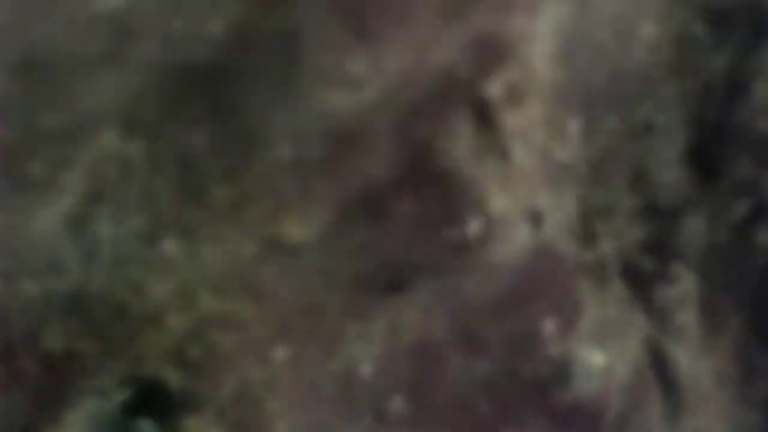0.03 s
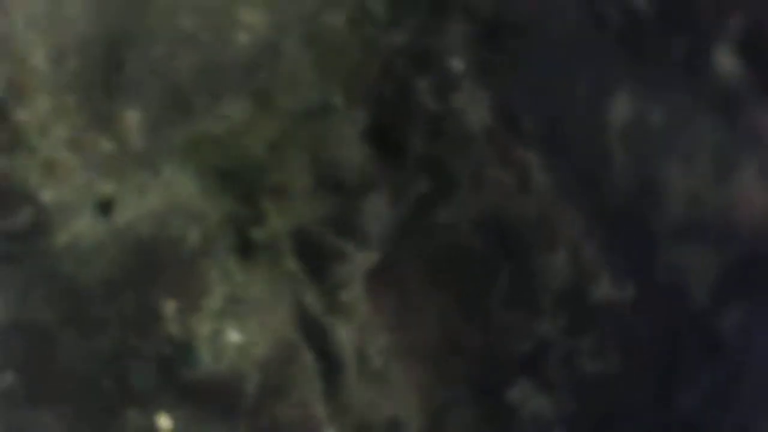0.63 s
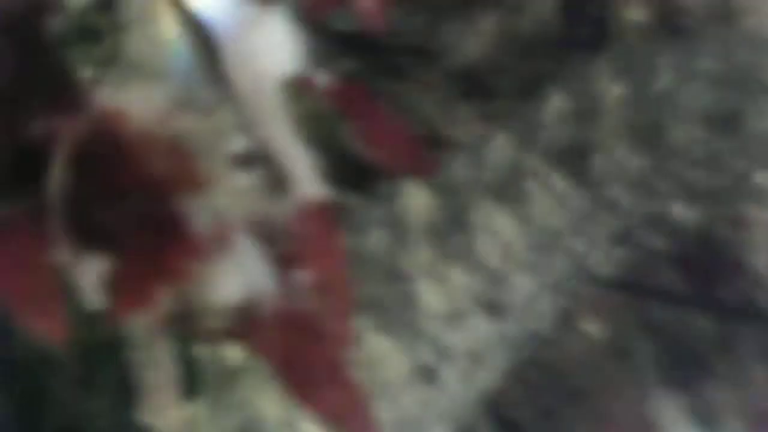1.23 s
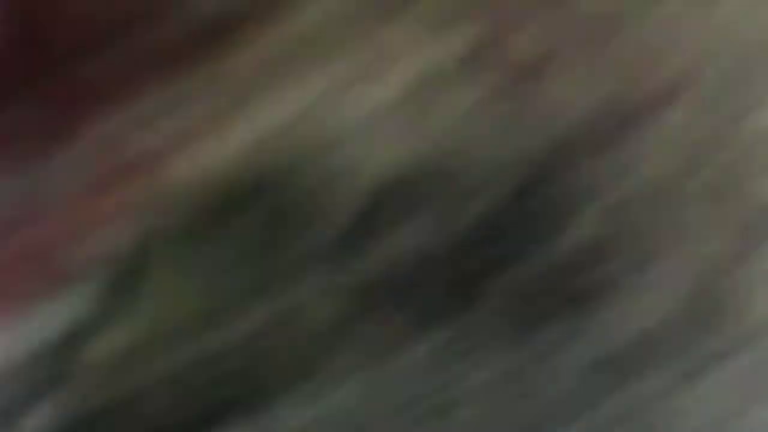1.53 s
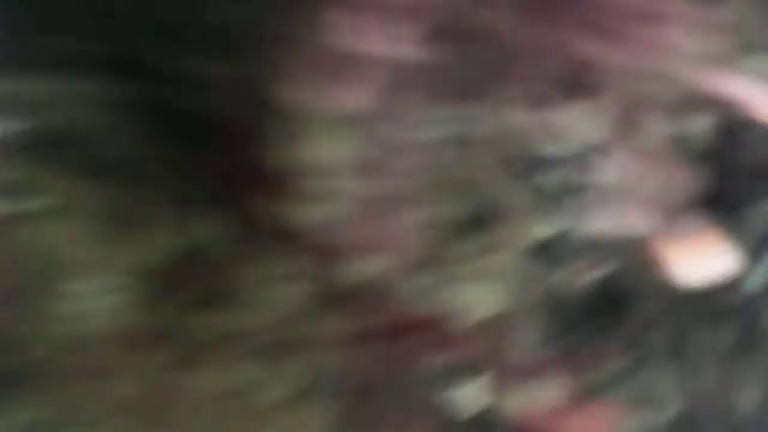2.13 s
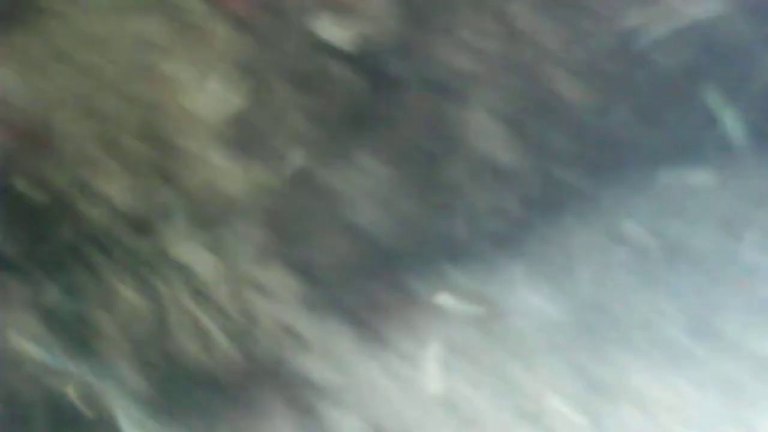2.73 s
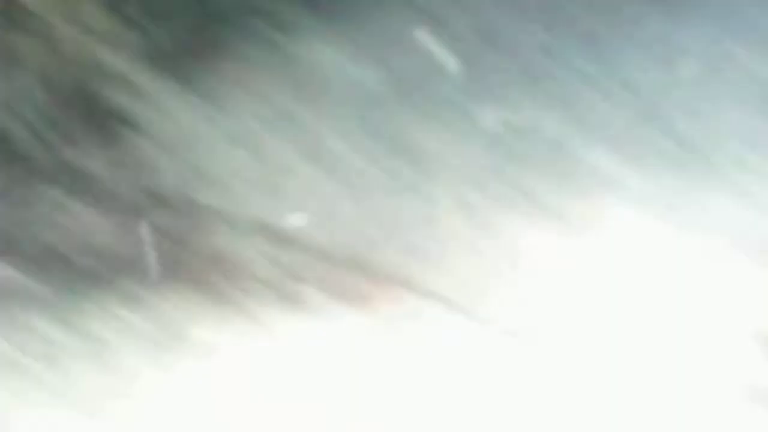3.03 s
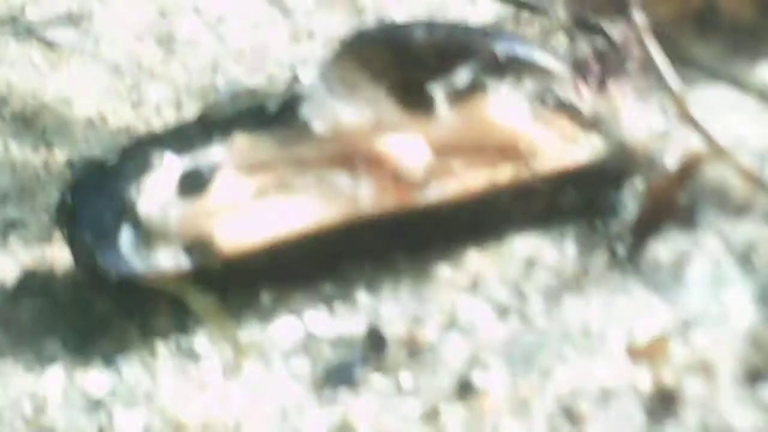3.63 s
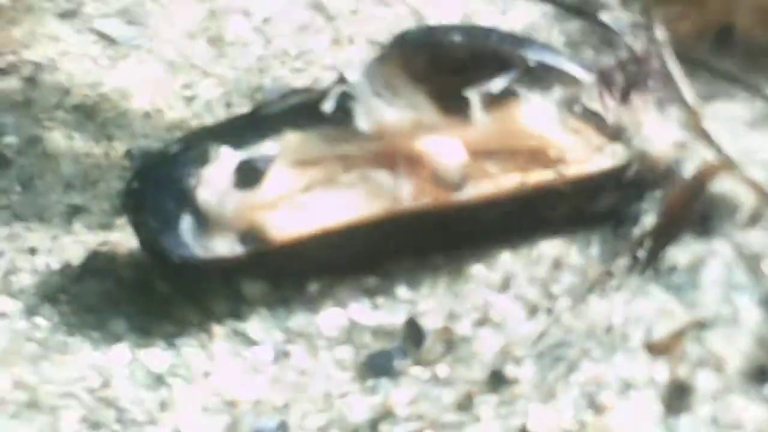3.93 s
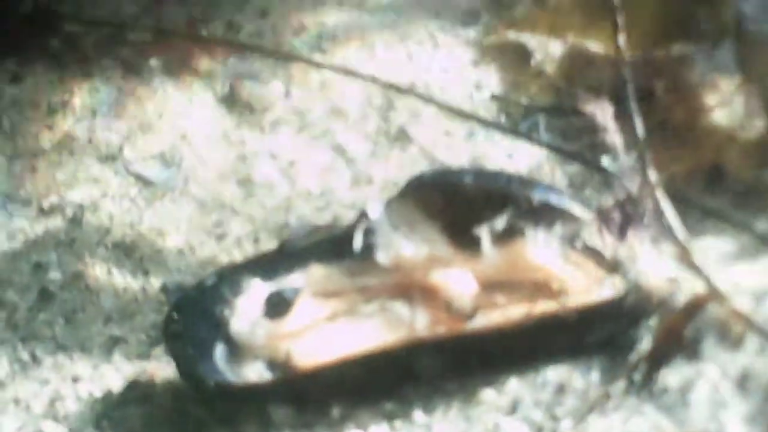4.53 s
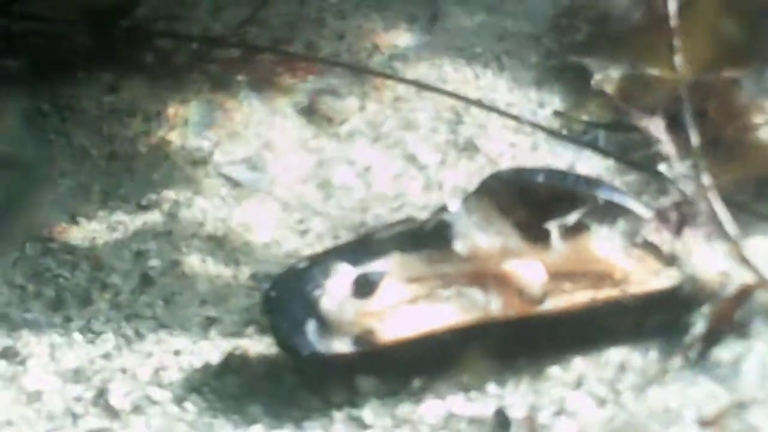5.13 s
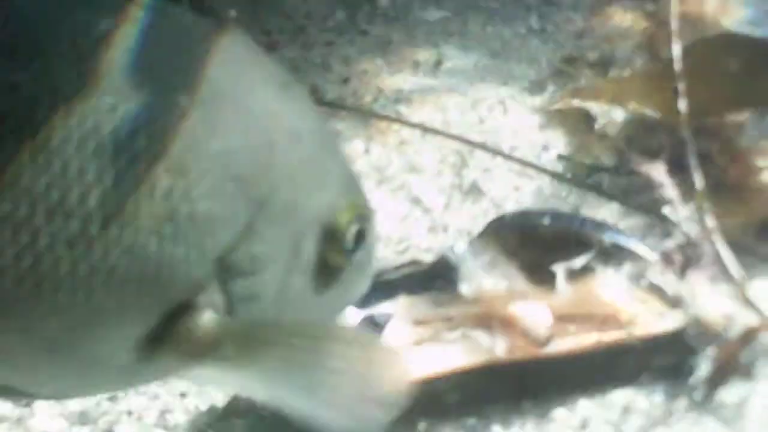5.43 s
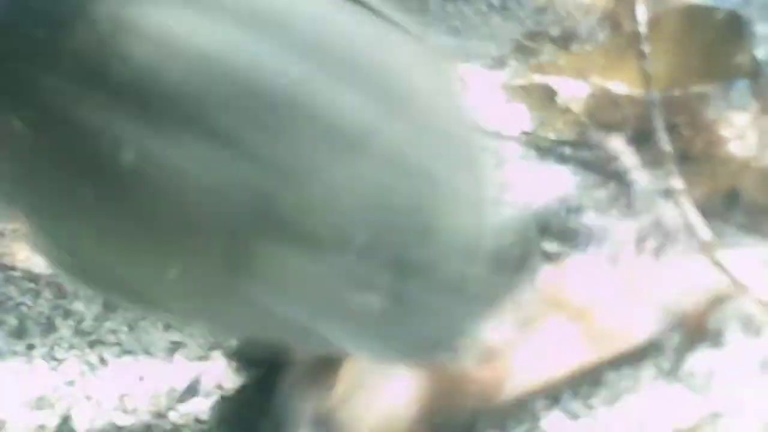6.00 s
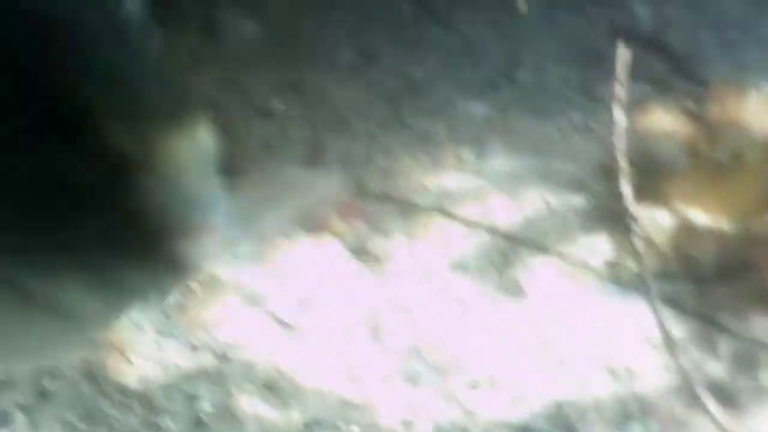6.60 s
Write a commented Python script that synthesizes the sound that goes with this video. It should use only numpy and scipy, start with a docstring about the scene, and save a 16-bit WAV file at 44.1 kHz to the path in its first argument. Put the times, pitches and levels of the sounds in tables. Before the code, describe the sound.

Close, boxy scrapes and booming knocks come as a waterproof camera bumps over rock in a tide pool, with dull churning water and small gravel taps around the enclosed microphone. After the loudest, distorted blow there is a lull with a faint whine and one clear bubble plop. Sloshing and fizzing resume with a few soft knocks, then two low swirls from a passing fish die away into whine and hiss.

```python
"""A camera in a waterproof housing is swept through a shallow tide pool, scraping on rock from the start.
Muffled water rumbles, washes and fizzes around it, and loose gravel taps the shell. Blows excite the
hollow housing's resonances, and the hardest booms overload the microphone. Then the water calms, the
camera's thin whine shows and a bubble plops. The flow returns with lighter knocks, a fish stirs two
deep swirls, and the water dies away to leave the whine."""
import sys
import numpy as np
from scipy import signal
from scipy.fft import rfft, irfft, next_fast_len
from scipy.io import wavfile
from scipy.ndimage import map_coordinates

SR = 44100
rng = np.random.default_rng(int(sys.argv[2]) if len(sys.argv) > 2 else 0)


def output_pcm(signal):
    """Save a mono or channel-first signal as 16-bit PCM at the path in sys.argv[1].

    Samples are clipped to [-1, 1] before scaling.
    """
    pcm = np.clip(np.atleast_2d(signal).T, -1, 1) * 32767
    wavfile.write(sys.argv[1], SR, np.round(pcm).astype(np.int16))


N = 298116

# modes of the hollow housing: (ratio to the boom pitch, level [dB], t60 [s])
HOUSING_MODES = [(1, 1.5, 0.035), (.88, -13, 0.083), (1.36, -18, 0.039), (2.02, -24, 0.066),
                 (2.9, -52, 0.018)]


def amp(db):
    """Decibels to amplitude ratio."""
    return 10 ** (np.asarray(db) / 20)


def unit(x):
    """Normalisation to rms 1."""
    return x / np.sqrt(np.mean(x ** 2) + 1e-20)


def curve(rows):
    """Linear interpolation of (time [s], value) at each sample."""
    return np.interp(np.arange(N) / SR, *np.transpose(rows))


def wobble(rate):
    """Smooth random modulation: a spline with rate knots a second."""
    knots = rng.standard_normal(int(N * rate / SR) + 4)
    return map_coordinates(knots, [np.arange(N) * rate / SR])


def coloured(x, points, size=8192):
    """Minimum-phase filtering by (frequency [Hz], gain [dB]) points."""
    hz, db = np.transpose(points)
    gain = amp(np.interp(np.log(np.fft.rfftfreq(size, 1 / SR) + 1), np.log(hz), db))
    cepstrum = irfft(np.log(gain))
    cepstrum[1:size // 2] *= 2  # folding the cepstrum makes the filter causal
    cepstrum[size // 2 + 1:] = 0
    return signal.fftconvolve(x, irfft(np.exp(rfft(cepstrum))))[:N]


def resonate(x, peaks):
    """Parallel resonators, with dips between their peaks."""
    return sum(amp(db) * signal.lfilter(*signal.iirpeak(hz, hz / width, fs=SR), x)
               for hz, width, db in peaks)


def low_pass(x, edge_hz, order):
    """Smooth roll-off above the edge."""
    return signal.sosfilt(signal.butter(order, edge_hz, fs=SR, output="sos"), x)


def below(x, edge_hz):
    """Band limiting with a steep edge, 400 Hz wide."""
    size = next_fast_len(N + SR // 2)
    gain = np.clip((edge_hz - np.fft.rfftfreq(size, 1 / SR)) / 400 + .5, 0, 1)
    return irfft(rfft(x, size) * gain, size)[..., :N]


def ring(modes, pitch=1):
    """Free vibration: a quarter second of damped sines."""
    t = np.arange(SR // 4) / SR
    return sum(amp(db - 60 * t / t60) * np.sin(2 * np.pi * f * pitch * t) for f, db, t60 in modes)


def add(track, s, sound):
    """Superposition of a sound on the track at time s."""
    part = track[round(s * SR):][:len(sound)]
    part += sound[:len(part)]


def patter(rate, spread_db):
    """Shot noise: random impulses of uneven size, rate a second, rms 1."""
    sizes = rng.standard_normal(N) * amp(spread_db * np.clip(rng.standard_normal(N), -2, 2))
    return unit(sizes * (rng.random(N) < rate / SR))


def flow():
    """Flow noise follows the water's speed past the housing: its level in dB at each sample."""
    # strength of the flow: (time [s], level [dB])
    strength = [(0.0, -46.5), (0.32, -39.5), (0.49, -34.5), (0.64, -39), (1.05, -39), (1.15, -36.5),
                (1.26, -41.5), (1.47, -45.5), (1.62, -47), (1.75, -46.5), (1.92, -62), (2.2, -66),
                (2.43, -70), (2.54, -54), (2.56, -53), (2.65, -47), (2.9, -43), (3.16, -47.5), (3.35, -47),
                (3.54, -55), (3.73, -45), (3.99, -50.5), (4.33, -53.5), (4.56, -56.5), (4.8, -52.5),
                (5.05, -53), (5.25, -57.5), (5.57, -61), (5.82, -65), (5.97, -64.5), (6.76, -71.5)]
    # the camera stalls briefly: (centre time [s], half length [s], depth [dB])
    stalls = [(0.923, 0.019, 10), (1.356, 0.026, 8), (1.59, 0.015, 7), (4.08, 0.056, 5)]
    t = np.arange(N) / SR
    return curve(strength) - sum(db * np.exp(-.5 * ((t - s) / half_s) ** 2) for s, half_s, db in stalls)


def swirls(steepness=2.55):
    """Passing vortices swell and die away: their rumble, wash and fizz amplitudes."""
    # frothy from the camera, deep from a fish:
    # (centre time [s], half length [s], rumble [dB], wash [dB], fizz [dB])
    vortices = [(0.015, 0.052, -28, -32, -39), (.62, 0.034, -41, -26.5, -38.5),
                (2.508, 0.043, -37, -27.5, -45), (2.764, 0.14, -44, -32.5, -65),
                (3.675, 0.13, -48.5, -36, -38), (4.006, 0.062, -59, -53, -47.5),
                (4.753, 0.093, -51, -39.5, -51), (5.117, 0.11, -45.5, -40, -52),
                (5.62, 0.097, -38.5, -44, -59.5), (5.919, 0.078, -41.5, -44.5, -59)]
    t = np.arange(N) / SR
    return sum(np.outer(amp(levels_db), np.exp(-.5 * np.abs((t - s) / half_s) ** steepness))
               for s, half_s, *levels_db in vortices)


def rumble(flow_db, swirl):
    """Turbulence: low pressure fluctuations of flow and swirls add in power."""
    # rumble relative to the flow: (time [s], level [dB])
    bass = [(0, 5), (1.9, 6), (2.6, -2.5), (4.0, -2), (4.4, 7), (6.7, 4.5)]
    # spectrum of the eddies: (frequency [Hz], gain [dB])
    spectrum = [(40, -3.5), (100, -10.5), (170, 2), (240, -3), (320, 7), (400, -5), (520, -20.5),
                (900, -78.5)]
    level = np.hypot(amp(flow_db + curve(bass)), swirl)
    return level * unit(coloured(patter(1500, spread_db=-3.0), spectrum))


def wash(flow_db, swirl, over_flow_db=7.5):
    """Forced resonance: churning water drives the air and plastic around the microphone."""
    # their resonances: (frequency [Hz], bandwidth [Hz], gain [dB])
    peaks = [(526, 21.7, 4), (614, 44, 6.5), (774, 118, 7), (1010, 32, -20), (1040, 18, -31.5)]
    # band of the wash: (frequency [Hz], gain [dB])
    band = [(200, -16), (420, 2.5), (1200, -5.5), (2300, -9), (3000, -39.5)]
    churn = resonate(patter(5000, spread_db=3.0), peaks)
    return np.hypot(amp(flow_db + over_flow_db), swirl) * unit(coloured(churn, band))


def fizz(flow_db, swirl, brisk_flow_db=-41, growth=0.75):
    """Shot noise of tiny bursting bubbles, which grows more slowly than the flow."""
    # upper resonances of the housing: (frequency [Hz], bandwidth [Hz], gain [dB])
    peaks = [(1168, 80, 2), (1480, 44, -4), (1725, 180, 0.5), (2088, 130, 4.5), (2260, 120, -1),
             (2750, 200, -9), (3145, 170, -15.5), (3996, 350, -2.5), (6300, 3100, -26.5)]
    # band of the fizz: (frequency [Hz], gain [dB])
    band = [(400, -21), (1000, 7), (2380, -2.5), (2540, -16.5), (2750, 0), (3400, 4), (3560, -7), (3850, 1),
            (4350, -1), (4700, -13), (5600, -0.5), (7500, -6), (9000, -25.5)]
    froth = resonate(patter(9000, spread_db=-3.5), peaks)
    fizz_db = -46.5 + growth * (flow_db - brisk_flow_db)
    return np.hypot(amp(fizz_db), swirl) * unit(coloured(froth, band))


def surge(swirl, push_db=-8.5):
    """Slow pressure fluctuations of swell and swirls add in power."""
    # the swell eases as the camera settles: (time [s], level [dB])
    swell = [(0, -46), (1.8, -49.5), (3.5, -53.5), (4.4, -60), (6.76, -75)]
    # spectrum of the pressure: (frequency [Hz], gain [dB])
    spectrum = [(10, 0.5), (25, -8.5), (42, 0), (65, -6.5), (100, -17.5), (250, -62.5)]
    level = np.hypot(amp(curve(swell)), amp(push_db) * swirl)
    return level * unit(coloured(rng.standard_normal(N), spectrum))


def water():
    """Amplitude modulation: eddies make the flow noise flutter above the slow surge."""
    flow_db = flow()
    deep, sloshing, frothy = swirls()
    eddies = amp(wobble(60))
    return eddies * (rumble(flow_db, deep) + wash(flow_db, sloshing) + fizz(flow_db, frothy)) + surge(deep)


def drag(boom_hz=515, attack_s=0.0086, release_db_per_s=346):
    """Stick-slip friction on rock: every slip sets the housing ringing."""
    # scrapes: (start time [s], length [s], level [dB])
    scrapes = [(-.01, .1, -27), (0.506, 0.36, -30), (0.792, 0.091, -20), (1.0, 0.31, -32),
               (1.467, 0.26, -29), (1.749, .02, -25.5), (1.857, 0.061, -29.5)]
    # the shell's response to a slip: (frequency [Hz], gain [dB])
    scuff = [(100, -10.5), (300, -20), (490, 0.5), (620, 6.5), (900, -7), (1400, 1), (2300, 6.5),
             (2650, -3), (3200, 2.5), (4000, 14), (5000, -2), (8600, -36)]
    t = np.arange(N) / SR
    pressure = np.zeros(N)
    for s, length, db in scrapes:
        rise = np.clip((t - s) / attack_s, 0, 1)
        pressure += rise * amp(db - release_db_per_s * np.maximum(t - s - length, 0))
    slips = coloured(patter(1400, spread_db=1.5), scuff)
    return pressure * unit(signal.fftconvolve(slips, ring(HOUSING_MODES, boom_hz))[:N])


def gravel(taps_per_s=20, over_flow_db=11, spread_db=3.5, boom_hz=674):
    """Impulse response of the housing to random taps of gravel, harder in a faster flow."""
    sizes = amp(flow() + over_flow_db + spread_db * np.clip(rng.standard_normal(N), -2, 2))
    taps = sizes * (rng.random(N) < taps_per_s / SR)
    return signal.fftconvolve(taps, ring(HOUSING_MODES, boom_hz))[:N]


def contacts():
    """Elastic rebound: each blow is followed by a weaker, duller contact."""
    # blows on the housing: (time [s], boom [dB], boom pitch [Hz], thud [dB], grit [dB], rebound delay [s])
    blows = [ (.4006, -17, 670, -26, -27, .008), (0.4474, 7, 553, -36, -6.5, .006),
             (0.7689, -0.5, 513, -4.5, -12, 0.0066), (.8005, -5.5, 564, -40, -9.5, 0.0087),
             (.8146, 3.5, 541, -9, -12.5, 0.0055), (0.8448, -6.5, 530, -8.5, -16.5, .011),
             (0.885, -12, 675, -15, -17, .006), (0.9395, 9.5, 599, 2.5, 2.5, 0.0076),
             (1.026, -20, 840, -30, -46, .006), (1.0835, -9, 817, -19, -27, .006),
             (1.2781, -3, 700, 2, -14.5, 0.0075), (1.405, -20.5, 440, -30, -58, 0.0067),
             (1.609, -5.5, 582, -23, -25, 0.008), (1.618, -14, 493, -9, -21, 0.0082),
             (1.6324, 3, 569, -8.5, -9.5, 0.0061), (1.6587, 12.5, 574.5, 1.5, 1.5, 0.0093),
             (1.855, -22, 558, -52, -27.5, 0.0049), (2.4228, -28, 796, -50, -53, .006),
             (2.4501, -30.5, 710, -52, -27, .01), (2.715, -16.5, 710, -50, -28, .007),
             (2.9429, -23.5, 537, -49, -26.5, .006), (2.9732, -20.5, 573, -45, -34, 0.01),
             (2.999, -17.5, 495, -53, -49, .006), (3.2386, -30, 620, -56, -31.5, .007),
             (3.3135, -27, 660, -47, -40, .006), (3.5756, -17, 628, -22, -34, .006),
             (3.942, -30, 684, -55, -47, .006), (4.7838, -30, 680, -45, -57, .006),
             (6.512, -43, 564, -60, -48, .009)]
    for s, boom_db, pitch_hz, thud_db, grit_db, delay_s in blows:
        yield s, boom_db, pitch_hz, thud_db, grit_db
        yield s + delay_s, boom_db - 12, pitch_hz * .86, thud_db - 2.5, grit_db - 6


def knocks(grit_t60=0.025, contact_hz=2400, attack_s=0.00053, detune=.025):
    """Impact excitation: each contact rings the housing, flexes its walls and crushes a little grit."""
    # bending modes of the walls: (frequency [Hz], level [dB], t60 [s])
    wall_modes = [(45, -12.5, 0.011), (108, -48, 0.015), (184, -7, 0.027), (308, -6, 0.025)]
    # buzzing modes of the shell: (frequency [Hz], level [dB], t60 [s])
    shell_modes = [(1828, -10, 0.016), (2536, -0.5, 0.056), (3595, -28.5, 0.11)]
    # spectrum of grit crushed on the shell: (frequency [Hz], gain [dB])
    grit_spectrum = [(300, 10), (1000, 12), (1750, -1), (2100, 10), (2500, -9.5), (3000, -4.5), (3700, 2),
                     (4600, -6.5), (5400, -9.5), (7500, -23), (8600, -44), (12000, -29)]
    body, crunch = np.zeros(N), np.zeros(N)
    t = np.arange(SR // 4) / SR
    rise = 1 - np.exp(-t / attack_s)  # the plastic gives, so the boom takes a moment to build
    for s, boom_db, pitch_hz, thud_db, grit_db in contacts():
        boom = amp(boom_db) * ring(HOUSING_MODES, pitch_hz)
        thud = amp(thud_db) * ring(wall_modes)
        grit = amp(grit_db - 60 * t / grit_t60) * rng.standard_normal(len(t))
        buzz = amp(grit_db - 8.0) * ring(shell_modes, 1 + detune * rng.standard_normal())
        add(body, s, rise * (boom + thud))
        add(crunch, s, grit + buzz)
    return low_pass(body, contact_hz, order=2) + amp(-1.5) * coloured(crunch, grit_spectrum)


def bubbles(attack_s=0.00067, muffle_hz=2600):
    """Bubble resonance: each rings as it pinches off, and the air in the housing answers."""
    # pinch-offs: (time [s], level [dB], pitch [Hz])
    pinch_offs = [(1.888, -28, 1790), (2.06, -33.5, 1320), (2.3763, -1, 1245), (2.778, -21.5, 1760),
                  (6.513, -38, 1730)]
    # modes of a bubble: (ratio to its pitch, level [dB], t60 [s])
    bubble_modes = [(1, -4.5, 0.024), (1.06, -17, 0.044), (1.52, -20, .02)]
    # modes of the enclosed air: (frequency [Hz], level [dB], t60 [s])
    cavity_modes = [(566, -14.5, 0.066), (792, -10.5, 0.031)]
    plops = np.zeros(N)
    rise = 1 - np.exp(-np.arange(SR // 4) / SR / attack_s)
    for s, db, hz in pinch_offs:
        add(plops, s, amp(db) * rise * (ring(bubble_modes, hz) + ring(cavity_modes)))
    return low_pass(plops, muffle_hz, order=3)


def camera(hiss_db=-52.0, waver=0.00094):
    """Self-noise: the electronics whine and hiss throughout, masked until the water calms."""
    # tones of the whine: (frequency [Hz], rms level [dB])
    tones = [(435.0, -64), (764.4, -48), (2239, -73), (4479, -76)]
    # spectrum of the hiss: (frequency [Hz], gain [dB])
    spectrum = [(30, 12), (110, -7.5), (330, -14), (450, 0), (650, -6.5), (1000, -36), (2100, -12.5),
                (2700, -17), (7400, -13.5), (8300, -23), (8900, -30)]
    clock = np.cumsum(1 + waver * wobble(10)) / SR
    whine = sum(amp(db) * np.sqrt(2) * np.sin(2 * np.pi * hz * clock) for hz, db in tones)
    return whine + amp(hiss_db) * unit(coloured(rng.standard_normal(N), spectrum))


def scene():
    """Superposition of all sources at one microphone inside the housing."""
    return (water() + gravel() + drag() + knocks() + bubbles() + camera())[None]


def record(dry):
    """Saturation: hard blows clip the narrow-band microphone; only their overtones exceed its range."""
    mic_hz, top_hz = 8500, 16000
    ceiling, hardness = .71, 12
    heard = below(dry, mic_hz)
    clipped = heard / (1 + np.abs(heard / ceiling) ** hardness) ** (1 / hardness)
    in_band = below(clipped, mic_hz)
    overtones = clipped - in_band
    return below(in_band + amp(-7.0) * overtones, top_hz)


dry = scene()
out = record(dry)
output_pcm(out)
```